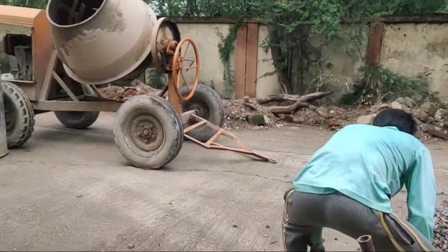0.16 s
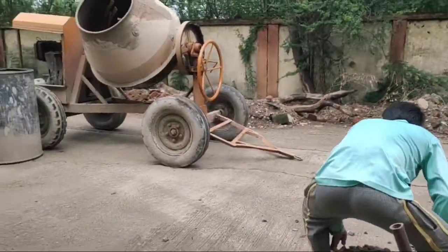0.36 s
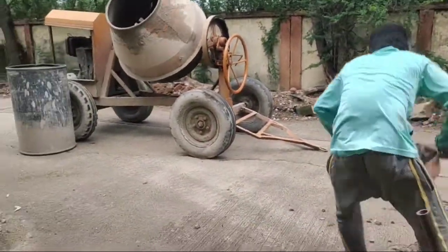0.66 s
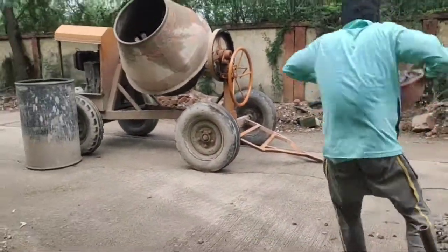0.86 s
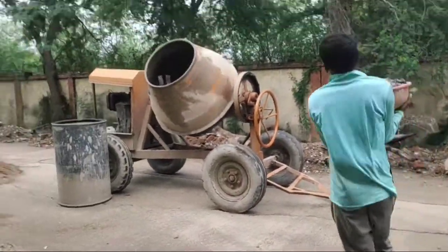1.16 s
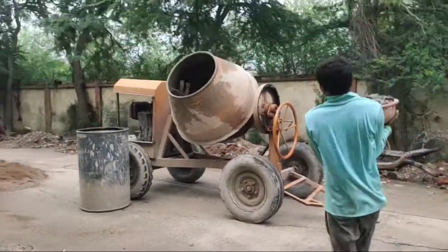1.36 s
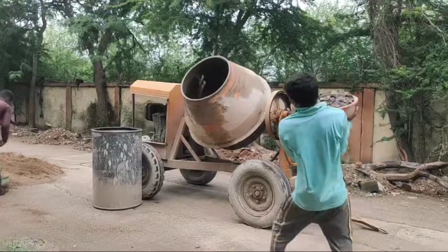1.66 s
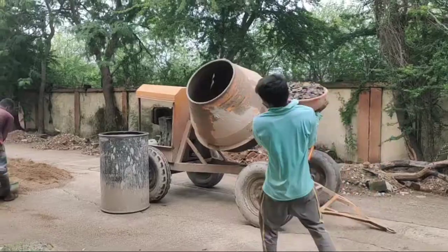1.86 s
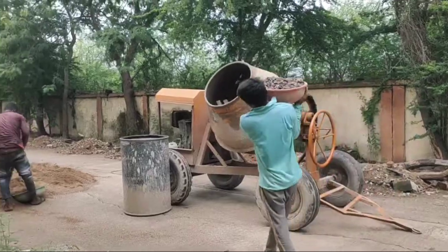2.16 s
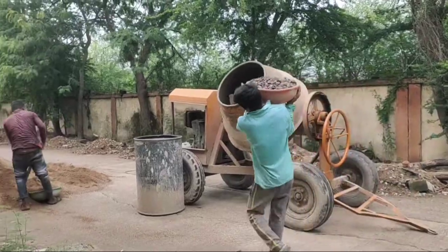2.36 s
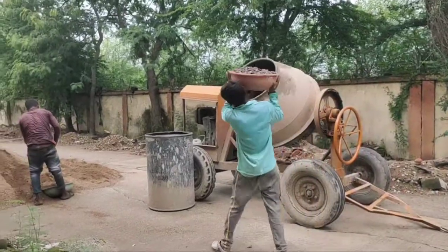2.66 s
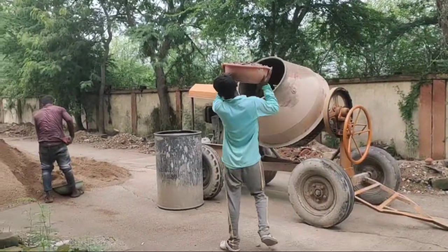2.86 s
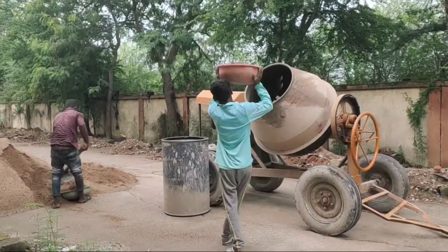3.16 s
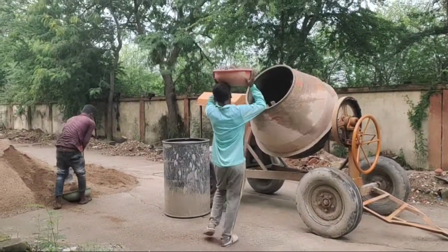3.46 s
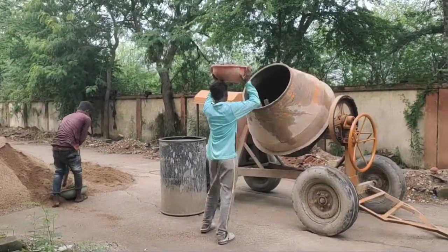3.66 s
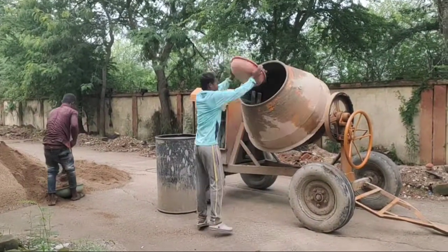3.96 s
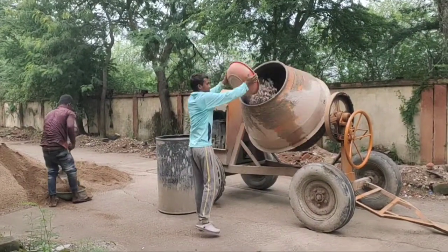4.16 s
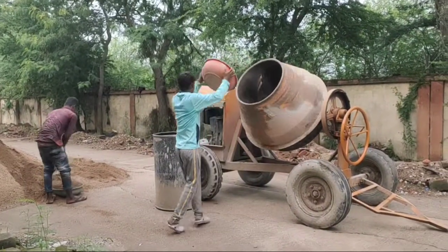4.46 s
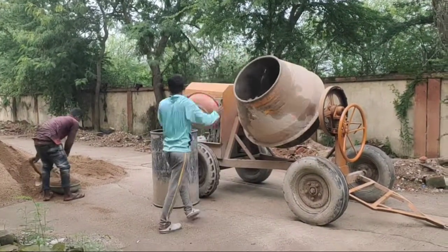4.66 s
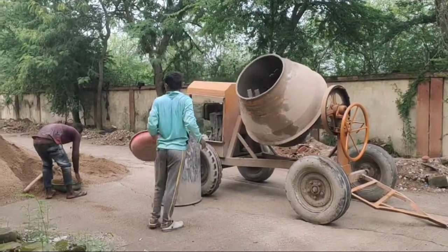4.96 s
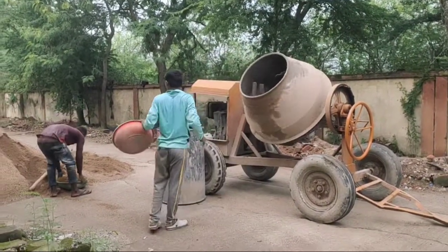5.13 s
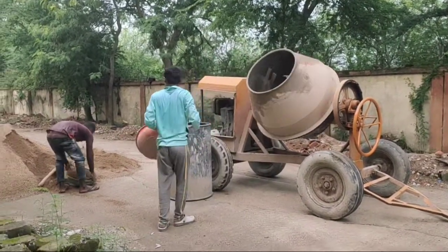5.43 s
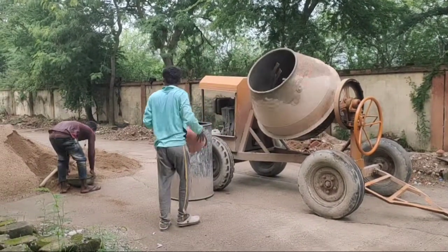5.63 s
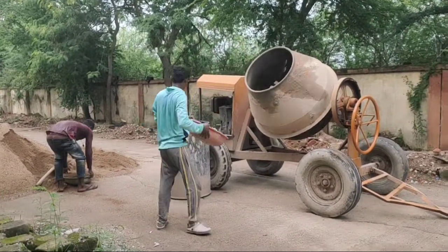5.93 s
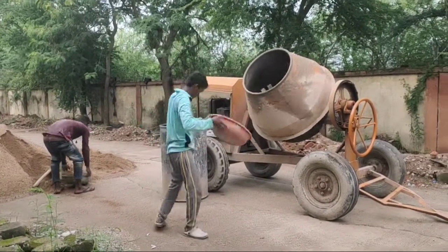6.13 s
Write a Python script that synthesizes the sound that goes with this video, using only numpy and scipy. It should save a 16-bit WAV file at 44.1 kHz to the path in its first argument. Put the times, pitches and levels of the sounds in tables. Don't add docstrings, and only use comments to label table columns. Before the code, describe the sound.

A concrete mixer runs throughout in an open walled yard, heard by a phone a few metres away. Its single-cylinder diesel thumps rapidly, roughly nine beats a second, with a ringing pipe and rumbling frame. Stones tumble in the steel drum from the start, a grainy, bright wash with clacks, slides and a hollow airy note. The load drops heavily around 0.85 and 1.1 seconds, the latter with dull shell knocks. Sharp stone strikes cluster near 2.0 and again, denser, from 3.0 to 3.45, followed by a dull ringing boom at 3.6. From about 4.05 gravel trickles from a pan, surging loudest at 4.35 to 4.7 with a briefly rising hollow tone. A heavy thud lands near 4.9. The new stones settle with bright cracks, notably at 5.3, 5.7 and 5.85, while churning and engine continue unbroken to the end at about 6.3 seconds.

```python
import sys
import numpy as np
from scipy import signal
from scipy.fft import rfft, irfft, next_fast_len
from scipy.io import wavfile
from scipy.ndimage import uniform_filter1d, map_coordinates

SR = 44100
rng = np.random.default_rng(int(sys.argv[2]) if len(sys.argv) > 2 else 0)


def digitize_waveform(pressure):
    field = np.atleast_2d(pressure).T
    bounded = np.clip(field, -1, 1)
    quanta = np.round(bounded * 32767).astype(np.int16)
    wavfile.write(sys.argv[1], SR, quanta)


def volts_from_decibels(level):
    exponent = np.asarray(level, float) / 20
    return 10 ** exponent


N = 277374
TIME = np.arange(N) / SR
CYCLE_HZ = 9.43


def level(x, db):
    return x * volts_from_decibels(db) / np.sqrt(np.mean(x ** 2))


def ring(x, hz, width):
    return signal.lfilter(*signal.iirpeak(hz, hz / width, fs=SR), x)


def on_log(table, hz):
    f, v = np.transpose(table)
    return np.interp(np.log(hz), np.log(f), v)


def over_time(table, s):
    return np.interp(s, *np.transpose(table))


def walk(rate):
    count = int(N / SR * rate) + 4
    return map_coordinates(rng.standard_normal(count), [1 + TIME[::64] * rate], order=3).repeat(64)[:N]


def shape(x, db):
    grid = dict(fs=SR, nperseg=1024, noverlap=704)
    hz, s, z = signal.stft(x, **grid)
    return signal.istft(z * volts_from_decibels(db(hz[:, None] + 1, s)), **grid)[1][..., :N]


def patches(hz, s, per_octave, rate):
    row, col = np.broadcast_arrays(per_octave * np.log2(hz / 100 + 1), rate * s)
    return 1.6 * np.tanh(map_coordinates(rng.standard_normal((250, 300)), [row, col], order=1))


def together(*dbs):
    return 10 * np.log10(sum(volts_from_decibels(db) ** 2 for db in dbs))


def delayed_pair(x, lag):
    return np.array([np.interp(np.arange(N) - lag, np.arange(N), x), x])


def grains(share, spread_db, lag, apart):
    chance, sign, force = rng.random((3, N))
    hard = np.minimum(-spread_db * np.log(1 - force), 4 * spread_db)
    x = level((chance < share) * np.sign(sign - 0.5) * volts_from_decibels(hard), 0)
    return level(delayed_pair(x, lag) + apart * rng.standard_normal((2, N)), 0)


def place(x, lag, wet_db, t60):
    t = np.arange(int(t60 * SR)) / SR
    echo = rng.standard_normal((2, SR))[:, :len(t)] * volts_from_decibels(-60 * t / t60) * np.minimum(t / 0.00097, 1)
    echo /= np.sqrt(np.sum(echo ** 2, axis=1, keepdims=True))
    wet = signal.fftconvolve(x[None], echo, axes=1)[:, :N]
    return delayed_pair(x, lag) + volts_from_decibels(wet_db) * wet


def blows(table, rise_s):
    return sum(volts_from_decibels(db - 60 * np.clip(TIME - s, 0, 2) / t60) * np.clip((TIME - s) / rise_s, 0, 1)
               for s, db, t60 in table)


# (time [s], frame thud [dB], belly boom [dB], cone ring [dB])
LANDINGS = [(-0.1, -39, -42, -76), (0.301, -45, -40, -61), (0.848, -52, -42.5, -46),
            (1.08, -37.5, -46, -39.5), (1.4, -57, -41, -44), (1.75, -49, -44.5, -49),
            (2.25, -42, -40, -42.5), (2.75, -64, -68, -49), (3.58, -36, -42, -42),
            (3.9, -40.5, -44.5, -42.5), (4.6, -42.5, -49, -41), (4.88, -32, -40.5, -42.5),
            (5.1, -48, -56, -41.5), (5.5, -37.5, -64, -72), (6.05, -38, -40.5, -41.5)]


def landings(s, fade_db_s, rest_db, axis):
    rise_s = 0.053

    def swell(t):
        return np.maximum(np.where(t < 0, 20 * t / rise_s, -fade_db_s * t), -60)
    return together(rest_db, *(row[axis] + swell(s - row[0] - rise_s) for row in LANDINGS))


def frame_level():
    return landings(TIME[::64], 10, -44.5, axis=1).repeat(64)[:N]


# (frequency [Hz], level [dB])
GROUND_COLOUR = [(20, -41), (40, -19), (90, 15), (140, -5), (200, -20)]


def ground():
    size = next_fast_len(N)
    hz = np.arange(size // 2 + 1) * SR / size + 1
    spectrum = rfft(rng.standard_normal((3, N)), size) * volts_from_decibels(on_log([*GROUND_COLOUR, (900, -59)], hz))
    mid, left, right = irfft(spectrum, size)[:, :N]
    swell_db = 0.33 * (frame_level() + 39) + 2.0 * walk(3.72)
    return level(mid + 0.23 * np.array([left, right]), -67.5) * volts_from_decibels(swell_db)


def strokes(at, scatter_db, jitter_s):
    late, strength = rng.standard_normal((70, 2)).T
    i = (((np.arange(70) + at) / CYCLE_HZ + jitter_s * late) * SR).astype(int)
    inside = i < N
    x = np.zeros(N)
    x[i[inside]] = volts_from_decibels(scatter_db * strength)[inside]
    return level(x, 0)


# (time [s], level [dB], t60 [s])
HUMS = [
    (.846, -31, 0.55),
    (1.16, -31, 0.72),
    (1.484, -35, 0.34),
    (3.6, -37, 0.86),
    (4.9, -34, 0.78),
    (6.1, -51, .6),
]


def hum():
    drive = strokes(0.94, 2, 0.0025) + rng.standard_normal(N)
    return blows(HUMS, 0.034) * level(ring(drive, 238.6, 8.9), 0)


# (frequency [Hz], width [Hz], level [dB])
FRAME_MODES = [(80, 39, -29.5), (103, 93, -29), (179.8, 28.6, -4), (203, 48.5, -4), (267, 51, -4)]
# (frequency [Hz], width [Hz], level [dB])
PIPE_MODES = [(343.5, 16.8, 4.5), (394, 24, -9.5), (411, 5.1, -8.5)]
# (time [s], level [dB])
PIPE_LEVEL = [(0.0, -60.5), (0.07, -46), (0.23, -34), (0.4, -53.5), (1.96, -39.5), (2.07, -54), (2.14, -37),
              (2.21, -46), (2.42, -34.5), (3.17, -45), (3.21, -32.5), (3.5, -41.5), (3.78, -34.5),
              (4.19, -33), (4.34, -44.5), (4.89, -33.5), (6.18, -39.5), (6.29, -42)]


def engine():
    thump = strokes(0.76, 1.2, 0.0008)
    fire = strokes(0.0394, 1.6, 0.00037)
    panels, gas = rng.standard_normal((2, N))
    frame = np.zeros(N)
    for k, (hz, width, db) in enumerate(FRAME_MODES):
        shake = 1.93 * volts_from_decibels(2.44 * walk(4.9)) * panels
        drive = thump + min(hz / 250, 1) * (0.87 * fire + shake)
        frame += (-1) ** k * volts_from_decibels(db) * ring(drive, hz, width)
    drive = fire + 0.9 * strokes(0.155, 2, 0.0003) + 0.6 * strokes(0.265, 2, 0.0003) + 0.55 * gas
    pipe = np.zeros(N)
    for k, (hz, width, db) in enumerate(PIPE_MODES):
        pipe += (-1) ** k * volts_from_decibels(db) * ring(ring(drive, hz, width), hz, 3 * width)
    pipe = np.roll(pipe, -int(0.01208 * SR))
    return level(frame, 0) * volts_from_decibels(frame_level()) + level(pipe, 0) * volts_from_decibels(over_time(PIPE_LEVEL, TIME))


# (time [s], hollow note [dB], its frequency [Hz])
MOUTH_NOTE = [(0.0, -39, 1084), (0.49, -37.5, 1040), (0.537, -50, 1020), (0.73, -34.5, 1106),
              (1.52, -38, 1014), (1.94, -35.5, 1126), (2.12, -45.5, 954), (2.29, -35, 1053),
              (2.57, -57, 1010), (2.63, -38, 1030), (3.15, -38, 1044), (3.45, -32, 1084), (3.9, -36, 1144),
              (4.01, -44.5, 990), (4.41, -36, 1120), (4.5, -61, 1140), (4.55, -54, 925), (5.22, -37, 1110),
              (5.99, -42.5, 1076), (6.29, -37.5, 1040)]
# (time [s], level [dB], frequency [Hz])
PAN_NOTE = [
    (4.12, -55, 860),
    (4.2, -24.5, 860),
    (4.27, -24, 800),
    (4.32, -31.5, 860),
    (4.36, -23, 1000),
    (4.4, -31, 1080),
    (4.45, -27, 1160),
    (4.5, -61, 1180),
]
# (frequency [Hz], level [dB])
BELLY_COLOUR = [(250, -74), (400, 11.5), (450, 0.5), (680, 3), (740, 1), (840, 13), (930, 1.5), (1400, -43)]


def cavity_note(table, hz, s, width_hz):
    at, db, centre = np.transpose(table)
    off = (hz - np.interp(s, at, centre)) / width_hz
    return np.interp(s, at, db) - 20 * np.log10(1 + off ** 2)


def mouth():
    def hollow(hz, s):
        note = cavity_note(MOUTH_NOTE, hz, s, 62) + 6.0
        pan = cavity_note(PAN_NOTE, hz, s, 40) + 3
        boom = landings(s, 18.5, -52.5, axis=2)
        cone = landings(s, 13.0, -50.5, axis=3)
        belly = np.where(hz < 750, boom, cone) + on_log(BELLY_COLOUR, hz) - 5.0
        swell = patches(hz, s, 30, 11)
        air = np.maximum(note + 3.5 * swell, belly + 4.5 * swell)
        return np.maximum(air, pan + 1.5 * swell)
    return shape(grains(0.02, 1.62, 4.5, 0.68), hollow) * volts_from_decibels(19.5 - np.array([[0.6], [-0.6]]))


# (time [s], level [dB], t60 [s])
KNOCKS = [
    (1.066, -20, 0.1),
    (1.091, -13.5, 0.095),
    (1.112, -23, 0.074),
    (3.58, -24, 0.44),
    (4.342, -38, 0.063),
]


def knocks():
    x = blows(KNOCKS, 0.0035) * grains(0.3, 1.3, 3.3, 0.39)
    modes_hz = (250, 322, 428, 478, 510, 664, 600, 733, 860, 1040, 1180)
    return volts_from_decibels(10.0) * sum(ring(ring(x, hz, 200), hz, 37) for hz in modes_hz)


# (time [s], flow [dB])
POUR = [
    (4.09, -61),
    (4.15, -31),
    (4.27, -34),
    (4.35, -27.5),
    (4.455, -31),
    (4.5, -25.5),
    (4.56, -32.5),
    (4.63, -35),
]


def gravel_flow(s):
    return np.interp(s, *np.transpose(POUR), -90, -90)


def calm(s):
    return 1 - 0.42 * np.clip(gravel_flow(s) / 10 + 3.15, 0, 1)


def tumble(hits, load, colour, per_octave, patchy_db, flicker_db, jolt_db):
    def db(hz, s):
        drift = calm(s) * patchy_db * patches(hz, s, per_octave, 6)
        flicker = flicker_db * patches(hz, s, per_octave / 3, 28)
        return load(hz, s) + on_log(colour, hz) + drift + flicker
    jolt = np.exp(-((TIME * CYCLE_HZ - 0.04) % 1) / 0.087)
    return shape(hits * volts_from_decibels(jolt_db * jolt), db)


def slid(table, hz, s):
    edge_db, octaves = 16, 0.22
    at, length, db, centre = np.transpose(table)
    near = volts_from_decibels(-edge_db * (np.log2(hz / centre) / octaves) ** 2) ** 2
    moment = ((s - at[:, None]) / length[:, None]) ** 2
    return near @ volts_from_decibels(db[:, None] - edge_db * 2 * moment) ** 2


# (time of peak [s], length [s], level [dB], centre [Hz])
SLIDES = [(0.177, 0.64, -36, 2500), (0.747, 0.13, -35, 2450), (0.808, 0.37, -28, 3270),
          (1.093, 0.31, -33.5, 1670), (1.248, 0.095, -26.5, 2890), (1.454, 0.12, -35.5, 2080),
          (1.462, 0.2, -33.5, 1330), (1.575, 1, -34, 2930), (1.755, 0.095, -26.5, 2460),
          (1.71, 0.52, -34.5, 1550), (2.053, 0.19, -31, 2560), (2.347, 0.34, -33, 2055),
          (2.647, 0.2, -33, 1616), (2.737, 0.16, -34, 2340), (3.16, 0.55, -36.5, 2310),
          (3.437, 0.2, -25.5, 1855), (3.418, 0.24, -33.5, 2680), (3.693, 0.24, -32, 2035),
          (3.55, 0.3, -37.5, 1580), (3.394, 0.15, -31, 1350), (3.74, 0.09, -33, 2090),
          (4.25, 0.27, -35.5, 2600), (4.486, 0.15, -35, 2090), (5.364, 0.14, -43, 1560),
          (3.613, 0.072, -31, 2720), (3.766, 0.15, -30, 1570), (3.935, 0.37, -34, 2720),
          (4.17, 0.42, -32, 2060), (4.177, 0.25, -31.5, 1510), (4.4, 0.1, -26, 2630),
          (4.434, 0.24, -30, 1680), (5.136, 0.15, -31.5, 2580), (5.17, 0.091, -33, 1600),
          (5.488, 0.44, -29.5, 2250), (5.397, 0.16, -33, 1670), (6.034, 0.45, -33, 1703)]
# (time [s], level [dB])
SHELL_ROLL = [(0, -56), (0.6, -49.5), (1.2, -46.5), (2.8, -43), (3.2, -57), (3.5, -45), (4.5, -47.5),
              (4.75, -44.5), (5.1, -41.5), (6.29, -46)]


def shell_load(hz, s):
    return 10 * np.log10(slid(SLIDES, hz, s) + volts_from_decibels(over_time(SHELL_ROLL, s)) ** 2)


# (frequency [Hz], level [dB])
SHELL_COLOUR = [(700, -64), (1150, 8.5), (1400, -1), (1750, 4), (2300, -1), (2900, -1), (3250, -7),
                (3600, -28), (4500, -68)]


def shell():
    hits = grains(0.04, 2.74, 18.4, 1.0)
    return tumble(hits, shell_load, SHELL_COLOUR, 30, 6.77, 3.05, 1.0) * volts_from_decibels(15.0)


# (time [s], level [dB], share of hard dry stone [dB])
CHURN = [(0.0, -41, 6), (0.33, -44, 1.5), (0.52, -45, 9), (0.79, -40, 3), (1.33, -43.5, -0.5),
         (2.07, -41.5, 0), (2.56, -46.5, 6), (3.05, -43.5, 1.5), (3.21, -41, 1), (3.33, -37, -1.5),
         (3.68, -48.5, 3.5), (3.99, -42.5, 1.5), (4.17, -41, 2), (4.33, -45.5, 24), (4.75, -42.5, 2),
         (4.94, -36, 3.5), (5.94, -36, 2.5), (6.29, -40.5, 6)]
# (time of peak [s], length [s], level [dB], centre [Hz])
SKATES = [(.05, .2, -35.5, 6940), (.72, 0.29, -30.5, 3820), (1.55, 0.25, -35, 3520), (1.35, .2, -49, 5300),
          (1.8, 0.34, -35, 4940), (1.75, .4, -53, 6160), (2.1, .2, -47, 4370), (2.2, 0.38, -41, 6700),
          (2.45, .15, -45, 5200), (3.38, 0.16, -36, 4000), (3.8, 0.18, -53.5, 3230), (4.2, 0.17, -30, 5200),
          (4.38, 0.18, -28, 6530), (4.75, 0.39, -36, 6400), (5.12, .25, -37, 5000), (5.3, 0.27, -56, 3380),
          (5.45, 0.19, -41, 4200), (5.45, 0.44, -42, 6200), (5.85, 0.19, -33, 4100), (6.0, 0.22, -55, 6600)]
# (dull [Hz], bright [Hz], grit [Hz])
STONES_HZ = (3520, 6190, 9700)
# (dull [dB], bright [dB], grit [dB])
POUR_COLOUR_DB = (-6.5, -1.5, -14)


def stones_load(hz, s):
    at, db, hard = np.transpose(CHURN)
    db, hard = np.interp(s, at, db), np.interp(s, at, hard)
    effort = db + 42.5
    flow = gravel_flow(s)
    blade_s, first_s, width_s = 1.724, 0.65, 0.19
    off = (s - first_s + blade_s / 2) % blade_s - blade_s / 2
    scrape = 3.5 * np.exp(-(off / width_s) ** 2)
    dull = -43.5 + scrape + 0.66 * effort - 1.28 * hard
    grit = -61.5 + 1.17 * effort + 1.16 * hard
    group = np.interp(np.log(hz), np.log(STONES_HZ), np.arange(3))
    bed = sum(np.clip(1 - abs(group - k), 0, 1) * together(churn, flow + pour)
              for k, (churn, pour) in enumerate(zip((dull, db, grit), POUR_COLOUR_DB)))
    return together(bed, 10 * np.log10(slid(SKATES, hz, s) + 1e-12))


# (frequency [Hz], level [dB])
STONES_COLOUR = [(1500, -70), (2900, -5), (3300, 6), (4200, 5), (5000, 1), (5700, -0.5), (6700, 5),
                 (7500, -2), (8500, -6), (10500, -6), (11200, -15), (13000, -11), (14000, -10),
                 (15500, -13)]


def stones():
    hits = grains(0.14, 12.6, 14, 2.15)
    bed = tumble(hits, stones_load, STONES_COLOUR, 30, 4.2, 3.73, 4.6) * volts_from_decibels(9.5)
    return bed * volts_from_decibels(2 * walk(45) - 1.9)


# (time [s], peak [dB], shell share [dB], fade [s])
CLACKS = [(0.049, -21.5, -29, 0.13), (0.082, -21.5, -16, 0.18), (0.273, -27, -25, 0.58),
          (0.539, -22, -29, 0.1), (0.69, -24.5, -18, 0.67), (0.7637, -25, -10, 0.14),
          (0.9622, -46, -11, 0.17), (1.2256, -29, -35, 0.79), (1.833, -19, -7, 0.068),
          (1.873, -18.5, -11, 0.074), (1.983, -19, -28, 0.39), (2.057, -21.5, -14, 0.21),
          (2.537, -25, -8, 0.24), (2.764, -25.5, -11, 0.19), (2.985, -21, -12, 0.18),
          (3.086, -21.5, -8.5, 0.14), (3.2181, -24, -7, 0.1), (3.298, -21, -23, 0.079),
          (3.3437, -19, -9, 0.069), (3.383, -18.5, -5.5, 0.082), (3.4226, -19, -3.5, 0.14),
          (3.829, -27.5, -24, 0.11), (3.928, -26.5, -6.5, 0.44), (0.8614, -32, -7, 0.053),
          (1.7095, -47, -1, 0.18), (3.1872, -21, -19, 0.05), (3.6164, -31, -18, 1), (0.64, -26, -12, 0.15),
          (2.02, -22, -0.5, 0.14)]
# (time [s], peak [dB], shell share [dB], fade [s])
CLUMPS = [
    (4.038, -23, -5, 0.089),
    (4.116, -23.5, -2, 0.12),
    (4.168, -20, -12, 1),
    (4.3031, -24, -26, 0.2),
    (4.396, -12.5, -14.5, 0.12),
    (4.4643, -11, -16, 0.14),
    (4.568, -17.5, -11, 0.086),
    (4.66, -13.5, -22, 0.12),
    (4.7, -26, -30, 0.23),
]
# (time [s], peak [dB], shell share [dB], fade [s])
SETTLING = [(4.75, -26.5, -20, 0.18), (4.994, -20.5, -9, 0.12), (5.023, -27, -38, 0.23),
            (5.1615, -21, -20, 0.12), (5.207, -19, -9, 0.2), (5.36, -27, -33, 0.32),
            (5.421, -24.5, -2.5, 0.23), (5.5273, -26, -27, 0.17), (5.599, -28.5, -5, 1),
            (5.694, -14.5, -19, 0.082), (5.7932, -20.5, -13, 0.28), (5.835, -11, -23, 0.064),
            (5.886, -21.5, -15, 0.26), (5.977, -20, -13, 0.21), (6.027, -39, 10, 0.083),
            (6.199, -28, -8, 0.22)]
# (time [s], peak [dB], shell share [dB], fade [s])
TICKS = [(0.5147, -50, -12, 0.049), (0.5965, -19, -13, 0.052), (0.6225, -17, -10, 0.053),
         (0.9373, -24, -21, 0.065), (1.141, -22, -4, 0.062), (1.2396, -16.5, -19, 0.093),
         (1.4686, -35, -9, 0.07), (1.5554, -24, -9, 0.24), (1.6374, -25, -12, 0.062),
         (1.7774, -29, -10, 0.05), (1.9515, -25, -19, 0.097), (2.326, -24.5, 0, 0.24),
         (2.4478, -27, -15, 0.059), (2.6589, -25, -2, 0.077), (2.8674, -25, -2, 0.079),
         (3.1624, -23, -18, 0.07), (3.2735, -17.5, 0, 0.052), (3.4644, -23, -12, 0.07),
         (3.5344, -28, 4, 0.059), (3.5843, -29, -22, 0.07), (3.902, -29, -6, 0.09),
         (4.144, -19, -13, 0.041), (4.1844, -32, -12, 0.063), (4.226, -27, 0, 0.055),
         (4.2494, -41, -7, 0.034), (4.341, -9.5, -7.5, 0.064), (4.3694, -7.5, -12, 0.13),
         (4.415, -13, -16, 0.087), (4.435, -15, -6, 0.07), (4.5444, -18, -10, 0.064),
         (4.68, -10, -23, 0.19), (4.7835, -34, -24, 0.055), (4.805, -18, -12, 0.076),
         (4.889, -20, -29, 0.052), (5.1233, -20, -10, 0.063), (5.2844, -14, -12, 0.059),
         (6.0921, -44, 8, 0.054), (6.153, -24, 1, 0.18)]
# (frequency [Hz], level [dB])
CLACK_COLOUR = [(250, -77), (600, -47), (1100, -16.5), (2500, 1.5), (3500, -2), (5000, -1.5), (6700, 7.5),
                (7600, -12), (8600, -16.5), (11500, -32), (14000, -30)]


def clacks():
    bright, body = np.zeros(N), np.zeros(N)
    ticks = [(s, db - 7, shell_db, fade) for s, db, shell_db, fade in TICKS]
    for s, db, shell_db, fade in [*CLACKS, *CLUMPS, *SETTLING, *ticks]:
        i = int(s * SR)
        t = TIME[:N - i][:SR // 2]
        shower = volts_from_decibels(db - 60 * t / max(fade, 0.02)) * np.minimum(t / 0.004, 1)
        bright[i:i + len(t)] += shower
        body[i:i + len(t)] += shower * volts_from_decibels(shell_db + 14.0)
    spray = grains(0.15, 2.6, 18, 0.7)

    def shell_db(hz, s):
        return np.where(hz < 3000, on_log(CLACK_COLOUR, hz), -90) + 2.8 * patches(hz, s, 24.19, 9)

    def stone_db(hz, s):
        return np.where(hz < 3000, -90, on_log(CLACK_COLOUR, hz)) + patches(hz, s, 9.4, 26)
    return shape(body * spray, shell_db) + shape(bright * spray, stone_db)


# (time [s], peak [dB], ring [Hz])
STRIKES = [(0.0528, -26, 7330), (0.0812, -15, 6870), (0.2723, -26, 6440), (0.5442, -19, 6030),
           (0.6908, -20, 3700), (0.7113, -14, 3830), (0.7647, -21, 3130), (0.9373, -23, 3080),
           (0.9622, -24, 6340), (1.2211, -23, 3560), (1.8322, -28, 6390), (1.8756, -25, 6200),
           (1.9874, -8, 3160), (2.0083, -17, 7100), (2.0213, -17, 6230), (2.0597, -16, 6600),
           (2.7666, -24, 6350), (2.9791, -26, 6320), (2.9901, -21, 6760), (3.0869, -13, 3870),
           (3.1872, -28, 5910), (3.2181, -23, 4080), (3.2735, -17, 6210), (3.2984, -11, 6360),
           (3.3438, -7, 4170), (3.4256, -17, 6600), (3.934, -18, 3260), (4.0417, -12, 5130),
           (4.116, -13, 3790), (4.1425, -6, 5740), (4.1689, -27, 5130), (4.3031, -19, 6700),
           (4.3405, -14, 6570), (4.4014, -19.5, 6600), (4.4657, -11, 6560), (4.5426, -8, 4020),
           (4.5685, -12, 4100), (4.6633, -19, 5940), (4.6633, -11, 6400), (4.7516, -20, 6540),
           (4.7835, -27, 6600), (4.805, -25, 6700), (4.9955, -20, 5750), (5.023, -29, 6500),
           (5.1622, -26, 6130), (5.2086, -22, 6320), (5.3602, -18, 6800), (5.4216, -32, 6560),
           (5.6974, -26, 6740), (5.7937, -19, 7100), (5.8361, -24, 6520), (5.8865, -18, 6800),
           (5.912, -15, 6600), (5.9683, -20, 6540), (5.9808, -22, 6670), (6.1998, -19, 6700)]


def strikes():
    t60_s, spread = 0.033, 0.1124
    out, t = np.zeros(N + SR), TIME[:SR // 10]
    chance = rng.standard_normal((len(STRIKES), 2, 5))
    for (s, db, hz), (off, turn) in zip(STRIKES, chance):
        modes_hz = hz * (1 + spread * off)
        note = np.sin(2 * np.pi * modes_hz * t[:, None] + 3 * turn).sum(axis=1) / 3
        fade = volts_from_decibels(db - 8.5 - 60 * t / t60_s) * np.minimum(t / 0.00082, 1)
        out[int(s * SR):][:len(t)] += fade * note
    return place(out[:N], 18, -2, 0.078)


# (time [s], left over right [dB])
BEARING = [(0, 4.5), (1.0, 2.5), (1.6, 2.5), (2.4, 1), (6.29, 0.5)]


def scene():
    machine = place(engine(), 0.5, -8.0, 0.063) + ground() + hum()
    drum = mouth() + knocks() + shell() + stones() + clacks() + strikes()
    return machine + drum * volts_from_decibels(over_time(BEARING, TIME) * np.array([[0.5], [-0.5]]))


# (frequency [Hz], share)
DUCK_SHARE = [(100, 1.5), (340, 1.99), (600, 0.91), (760, 1.66), (1000, 0.25), (1600, 0.016)]


def duck(x):
    from_db, slope, window_s, release_s = -35, 0.73, 0.027, 0.2
    high = signal.butter(2, 3000, "high", fs=SR, output="sos")
    treble = signal.sosfilt(high, x.mean(axis=0))
    loud_db = 10 * np.log10(uniform_filter1d(treble ** 2, int(window_s * SR)) + 1e-12)
    over = np.maximum(loud_db - from_db, 0)
    keep = np.exp(-1 / (release_s * SR))
    over = np.maximum(over, signal.lfilter([1 - keep], [1, -keep], over))
    share = [*DUCK_SHARE, (2500, 0.013)]
    return shape(x, lambda hz, s: -slope * np.interp(s, TIME, over) * on_log(share, hz))


def band_limit(x):
    return signal.sosfilt(signal.butter(12, 15550, fs=SR, output="sos"), x)


def record(dry):
    dry = duck(dry)
    bass = signal.butter(2, (800 / 5.4, 800), "band", fs=SR, output="sos")
    side = signal.sosfiltfilt(bass, dry[0] - dry[1]) / 2
    left, right = dry - 0.11 * side * np.array([[1], [-1]])
    top = signal.sosfiltfilt(signal.butter(4, 11000, "high", fs=SR, output="sos"), left)
    left = left - 0.92 * top + ring(left, 7900, 950)
    return band_limit(np.array([left, right]))


dry = scene()
out = record(dry)
digitize_waveform(out)
```